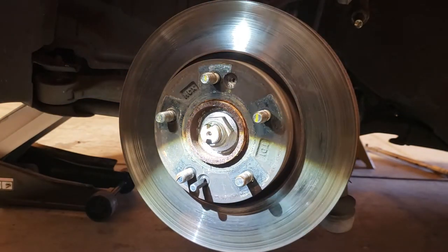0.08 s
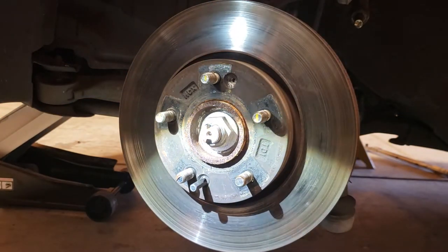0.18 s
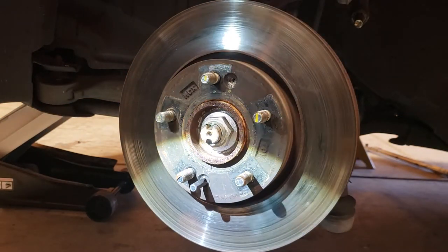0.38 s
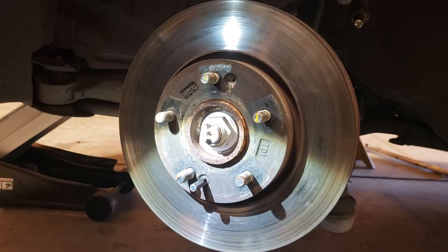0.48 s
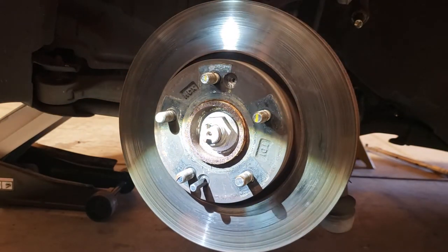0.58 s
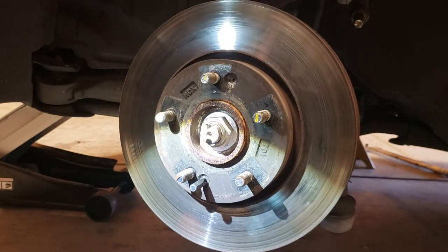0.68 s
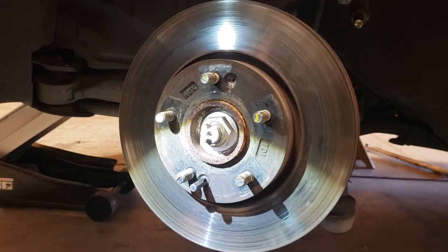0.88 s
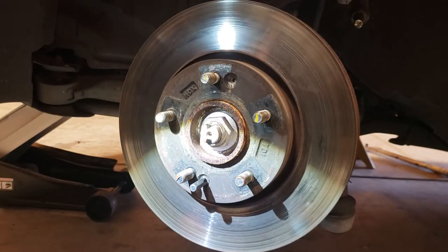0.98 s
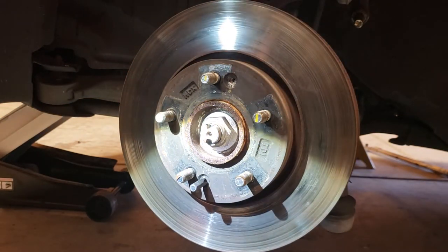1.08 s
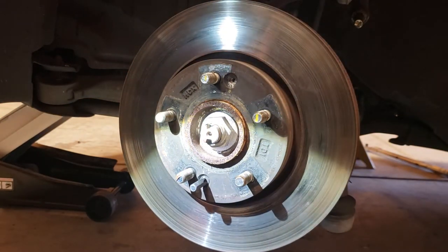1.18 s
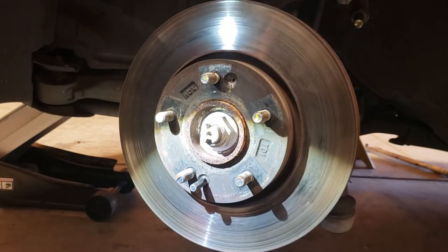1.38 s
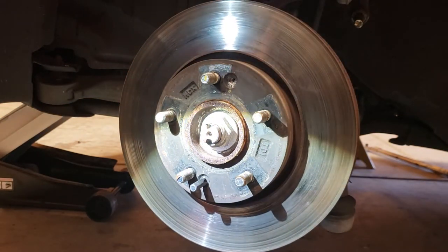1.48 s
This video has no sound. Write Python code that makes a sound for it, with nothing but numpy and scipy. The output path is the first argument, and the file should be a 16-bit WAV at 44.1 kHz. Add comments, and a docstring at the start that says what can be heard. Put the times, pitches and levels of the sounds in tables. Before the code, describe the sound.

A steel hand tool knocks sharply twice on a concrete garage floor, then clinks faintly once

```python
"""Steel tool on a garage floor

A steel hand tool is knocked twice on a concrete garage floor and then clinks once more, left of the microphones.
Each knock is a few quick contacts, each a sum of damped modes and a short click convolved with a noise-built
room response: near scatter, a slap from a far wall and a long tail.
Beneath lie low rumble and soft hiss (filtered noise), a faint hum (a sine of wandering phase) and one dull tick."""
import sys
import numpy as np
from scipy import signal
from scipy.fft import rfft, irfft, next_fast_len
from scipy.io import wavfile
from scipy.ndimage import uniform_filter1d

SR = 44100
rng = np.random.default_rng(int(sys.argv[2]) if len(sys.argv) > 2 else 0)


def int16_out(signal):
    """Quantize to a 16-bit WAV file."""
    q = np.round(np.clip(np.atleast_2d(signal).T, -1, 1) * 32767)
    wavfile.write(sys.argv[1], SR, q.astype(np.int16))


def linear_from_db(decibels):
    """Turn decibels (scalar or array-like) into linear amplitude factors; 0 gives 1."""
    return 10 ** (np.asarray(decibels, float) / 20)


N = 68355  # samples in the scene

# left-right correlation of the background; columns: hz, correlation
BED_ALIKE = [(40, 1), (100, 1), (400, 0.72), (1200, 0.87), (8000, .2)]
BED_PAN_DB = 10.5  # left over right, for hum, hiss and tick


def along(points, hz):
    """Interpolation on a logarithmic frequency axis, from (hz, value) points."""
    f, v = np.transpose(points)
    return np.interp(np.log(hz + 1), np.log(f + 1), v)


def curve(rows):
    """Gain envelope, linear in decibels between (time_s, level_db) points."""
    return linear_from_db(np.interp(np.arange(N) / SR, *np.transpose(rows)))


def filtered(x, response):
    """Linear filtering: the spectrum is multiplied by a complex frequency response."""
    n = x.shape[-1]
    m = next_fast_len(n + 8192)
    return irfft(rfft(x, m) * response(np.fft.rfftfreq(m, 1 / SR)), m)[..., :n]


def pair(n, alike):
    """Partial coherence: mid and side noises mixed to a correlation set at each frequency."""
    def mid_side_gains(hz):
        angle = np.arccos(np.clip(along(alike, hz), -1, 1)) / 2
        return np.array([np.cos(angle), np.sin(angle)])

    mid, side = filtered(rng.standard_normal((2, n)), mid_side_gains)
    return np.array([mid + side, mid - side])


def rush(n, spectrum, alike):
    """Spectral shaping of stereo noise, normalised to rms 1."""
    x = filtered(pair(n, alike), lambda hz: linear_from_db(along(spectrum, hz)))
    return x / x.std()


def panned(x, pan_db):
    """Interaural level difference: the left channel is louder by pan_db."""
    return x * linear_from_db(np.array([[pan_db / 2], [-pan_db / 2]]))


def rumble():
    """Low-frequency noise: a shaped random spectrum under a slow envelope."""
    # spectral density before normalisation; columns: hz, level_db
    spectrum = [(12, -39), (20, -12), (67, 15.5), (83, -2), (97, -1.5), (177, -8), (211, -17), (255, -11),
                (400, -24.5), (520, -53.5), (880, -120)]
    # envelope before panning; columns: time_s, level_db
    level = [(0, -57), (.55, -56), (.9, -59), (1.15, -61), (1.3, -53), (1.55, -57)]
    return panned(curve(level) * rush(N, spectrum, BED_ALIKE), 4)


def hum():
    """Phase modulation: a sine whose phase follows a smoothed random walk."""
    # rms envelope before panning; columns: time_s, level_db
    level = [(0, -75.5), (.9, -76.5), (1.1, -65), (1.55, -65)]
    hum_hz = 172
    t = np.arange(N) / SR
    drift_rad = np.cumsum(uniform_filter1d(rng.standard_normal(N), size=2000)) * 0.022
    tone = np.sqrt(2) * np.sin(2 * np.pi * hum_hz * t + drift_rad)
    return panned(curve(level) * tone, BED_PAN_DB)


def hiss():
    """Broadband noise: a shaped random spectrum under a slow envelope."""
    # spectral density before normalisation; columns: hz, level_db
    spectrum = [(240, -65.5), (400, -18), (446, -6), (1090, -10.5), (1180, -9.5), (1420, -9.5), (2430, -6),
                (3690, -11), (5350, -8), (8370, -22.5), (16000, -1)]
    # envelope before panning; columns: time_s, level_db
    level = [(0, -63.5), (.07, -61), (.13, -56.5), (.18, -64.5), (1.1, -75), (1.55, -79.5)]
    return panned(curve(level) * rush(N, spectrum, BED_ALIKE), BED_PAN_DB)


def crack(n):
    """Minimum phase: the folded cepstrum of a magnitude spectrum gives a causal click, here of peak 1."""
    # relative spectral density of the click; columns: hz, level_db
    spectrum = [(530, -32.5), (900, -16.5), (2030, -15), (3080, -10), (5390, -5.5), (6080, 0.5),
                (8760, -24), (10600, 0.5), (12200, -19), (13300, 1.5), (15900, -6), (16500, -22)]
    cepstrum = irfft(np.log(linear_from_db(along(spectrum, np.fft.rfftfreq(2 * n, 1 / SR)))))
    cepstrum[1:n] *= 2
    cepstrum[n + 1:] = 0
    x = irfft(np.exp(rfft(cepstrum)))[:n]
    return x / np.abs(x).max()


def ringing(t, hz, t60, level_db):
    """Modal superposition: damped sines of alternating sign, with levels scattered at each contact."""
    attack_s, scatter_db = 0.00056, 4.5
    sign = (-1) ** np.arange(len(hz))
    gain = sign * linear_from_db(level_db + scatter_db * rng.standard_normal(len(hz)))
    decay = linear_from_db(-60 * t / t60[:, None])
    modes = decay * np.sin(2 * np.pi * hz[:, None] * t)
    return gain @ modes * (1 - np.exp(-t / attack_s))


def tool():
    """Impact excitation: each contact sums steel modes, a crack and low body modes, as (start_s, sound)."""
    # contacts, one list for each knock; columns: start_s, ring_db, crack_db, thud_db
    knocks = [
        [(0.2075, -28, -11, -25), (.2088, -24, -2, -24), (.2100, -24.5, -10.5, -52), (.2115, -16.5, -1, -21.5),
         (.2130, -18.5, -5, -27.5), (.2142, -6, -14, -52), (.2450, -31, -20, -39.5), (.2465, -45.5, -6, -52)],
        [(0.5184, -42.5, -24, -23), (0.5215, -29, 1.5, -27.5), (.5230, -12, -11, -38), (.5255, -21, -17.5, -44),
         (.5290, -14, -6.5, -32), (.5325, -25.5, -0.5, -35)],
        [(1.2840, -19, -19, -46.5), (1.2850, -18, -13, -46.5), (1.2885, -17, -26, -61.5),
         (1.2945, -25, -33, -68)],
    ]
    # modes of the tool, levels before scatter; columns: hz, t60_s, knock_1_db, knock_2_db, knock_3_db
    steel_modes = [(3044, 0.017, -11.5, -16, -10), (3470, 0.0073, -17.5, -15, -1),
                   (3945, 0.0065, -5, -9.5, -2), (4395, 0.006, -11.5, -4.5, -18.5),
                   (5440, 0.0033, -27, -12, -3.5), (5960, 0.0088, -16, -18, -11), (6770, 0.005, -19, 4, -6),
                   (7160, 0.0047, -17, 1.5, 1.5), (9700, 0.01276, -26.5, -7.5, -35),
                   (10830, 0.013, -9.5, 0, -2), (11130, 0.014, -3.5, -6, -18),
                   (11580, 0.0079, -3, -6, -17.5), (13000, .01, 3, -13, -10.5),
                   (12800, 0.0033, -2, -5, -45), (13060, 0.0088, -11, -18, -33),
                   (15900, 0.0093, -8.5, -20, -24), (15600, .01, -9.5, -24.5, -5.5)]
    # low body of the knock, levels before scatter; columns: hz, t60_s, knock_1_db, knock_2_db, knock_3_db
    body_modes = [(206.7, 0.029, -2, -6, -17), (321.4, 0.056, -12.5, -3, -15), (462.6, 0.038, -2, -4, -9),
                  (640, 0.025, -15, -3, -21), (765.4, 0.036, -7, -12.5, -5),
                  (871, 0.038, -12.5, -5.5, -13.5), (1277, 0.02, -6, -6.5, -6), (1617, 0.014, -13, -11, -1)]
    thud_low_hz = 130  # corner of a second-order high-pass on each contact
    t = np.arange(SR // 8) / SR
    steel, body = np.transpose(steel_modes), np.transpose(body_modes)
    click = crack(len(t))
    low_cut = lambda hz: (1j * hz / (thud_low_hz + 1j * hz)) ** 2
    contacts = []
    for place, knock in enumerate(knocks):
        for start_s, ring_db, crack_db, thud_db in knock:
            sound = linear_from_db(crack_db) * click
            sound = sound + ringing(t, steel[0], steel[1], ring_db + steel[2 + place])
            sound = sound + ringing(t, body[0], body[1], thud_db + body[2 + place])
            contacts.append((start_s, filtered(sound, low_cut)))
    return contacts


def burst(t, t60, alike):
    """Exponential decay of stereo noise: left energy 1, silent before t = 0."""
    x = pair(len(t), alike) * linear_from_db(-60 * np.abs(t) / t60) * (t >= 0)
    return x / np.linalg.norm(x[0])


def garage():
    """Room impulse response: direct sound and near scatter, wall reflection, then reverberant tail."""
    # left-right correlation of scatter and wall; columns: hz, correlation
    near_alike = [(200, .97), (700, 0.68), (1500, 0.43), (3000, 0.26), (5500, 0.3), (10000, 1),
                  (14000, 0.2)]
    # left-right correlation of the tail; columns: hz, correlation
    tail_alike = [(100, 1), (300, 0.37), (700, 0.31), (1500, 0.29), (4000, 0.017)]
    # reverberation time of the tail; columns: hz, t60_s
    tail_t60 = [(150, 1.78), (400, 0.91), (1000, 1.37), (3000, 1.1), (6000, 0.95), (9000, 0.66),
                (12000, 0.47), (16000, 0.4)]
    # colour of the tail; columns: hz, level_db
    tail_colour = [(150, -3), (400, -4.5), (1000, -8.5), (2000, -4.5), (4000, -7.5), (7000, -10),
                   (10000, -11.5), (13000, -11.5), (16000, -12)]
    near_t60_s, near_db = .09, -5  # dense answer of floor and nearby things
    scuff_t60_s = .005  # each contact is a short rough scuff, not a clean tap
    scuff_from_hz = 900  # scuff and scatter roughen only the treble
    wall_s, wall_db, wall_t60_s = .0333, -10.5, .025  # slap from the far wall
    wall_top_hz = 6020  # the wall answers duller
    rise_s = 0.0035  # build-up of the tail
    t = np.arange(SR) / SR
    low_pass = lambda f, top_hz: top_hz / (top_hz + 1j * f)

    rough = linear_from_db(near_db) * burst(t, near_t60_s, near_alike) + burst(t, scuff_t60_s, near_alike)
    early = filtered(rough, lambda f: 1 - low_pass(f, scuff_from_hz))
    impulse = 1. * (t == 0)
    early += filtered(impulse, lambda f: low_pass(f, scuff_from_hz))

    # each frequency band of the tail decays at its own rate
    hz, frame_s, z = signal.stft(pair(SR, tail_alike), SR, nperseg=256)
    decay = linear_from_db(-60 * frame_s / along(tail_t60, hz)[:, None])
    tail = signal.istft(z * decay, SR, nperseg=256)[1][:, :SR]
    tail = tail * (1 - np.exp(-t / rise_s)) / np.linalg.norm(tail[0])
    tail = filtered(tail, lambda f: linear_from_db(along(tail_colour, f)))

    slap = burst(t - wall_s, wall_t60_s, near_alike)
    wall = linear_from_db(wall_db) * filtered(slap, lambda f: low_pass(f, wall_top_hz) ** 2)
    return panned(early, 7) + panned(tail + wall, 4.5)


def tick():
    """Damped oscillation: one faint dull tick from a single decaying sine."""
    tick_s, tick_hz, tick_db, tick_t60_s = 1.093, 900, -57, .03  # level before panning
    since = np.maximum(np.arange(N) / SR - tick_s, 0)
    decay = linear_from_db(tick_db - 60 * since / tick_t60_s)
    return panned(decay * np.sin(2 * np.pi * tick_hz * since), BED_PAN_DB)


def scene():
    """Superposition: every contact is convolved with its own random draw of the room."""
    out = rumble() + hum() + hiss() + tick()
    for start_s, sound in tool():
        start = round(start_s * SR)
        wet = signal.fftconvolve(sound[None], garage(), axes=1)[:, :N - start]
        out[:, start:start + wet.shape[1]] += wet
    return out


def roll_off(x):
    """The treble ends steeply here."""
    return signal.sosfilt(signal.butter(12, 16990, fs=SR, output="sos"), x)


def record(dry):
    """Time-of-arrival difference: the left microphone leads, and the top treble falls away in both."""
    # microphone response, constant below the first point; columns: hz, level_db
    mic_top = [(15500, -3), (16000, -6), (16600, -24), (17500, -43.5)]
    left_lead_s = .00014
    lag = lambda hz: np.exp(-2j * np.pi * hz * np.array([[0], [left_lead_s]]))
    mix = filtered(dry, lambda hz: linear_from_db(along(mic_top, hz)) * lag(hz))
    return roll_off(mix)


dry = scene()
out = record(dry)
int16_out(out)
```